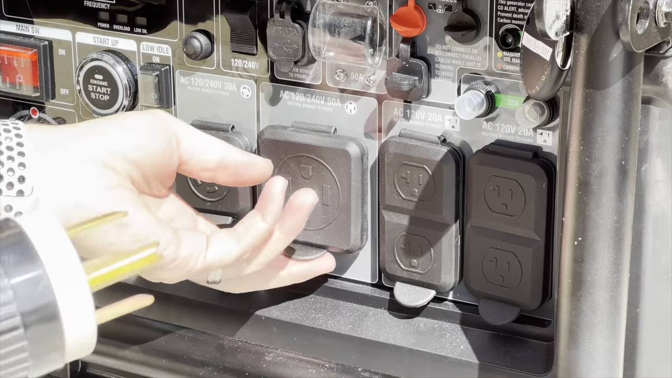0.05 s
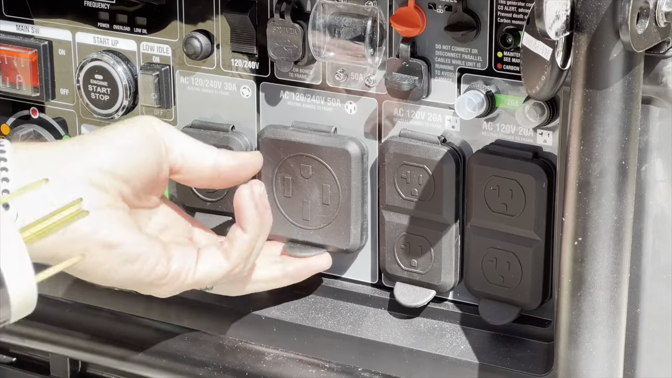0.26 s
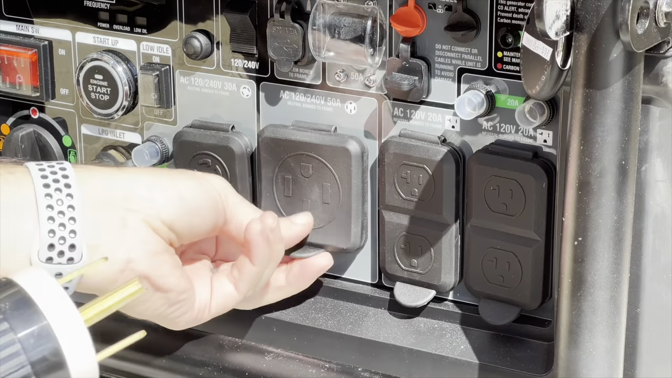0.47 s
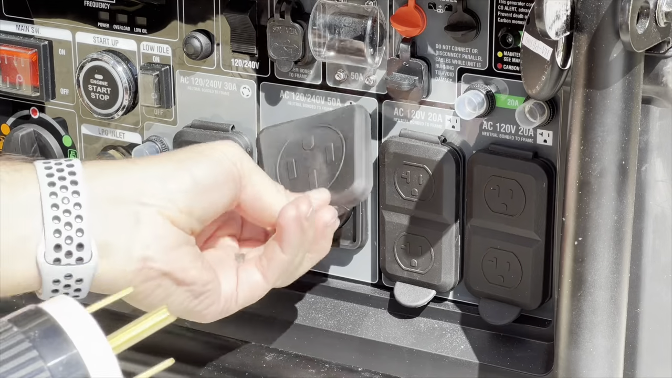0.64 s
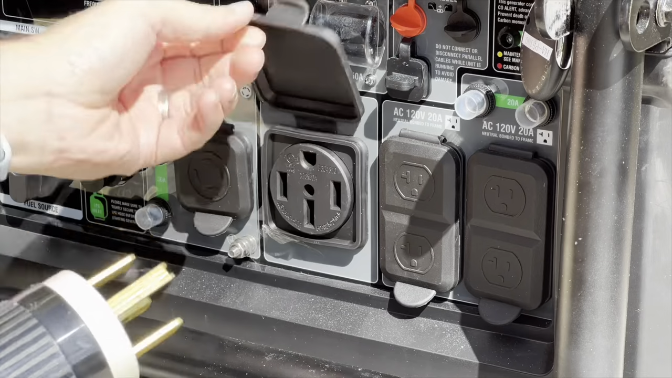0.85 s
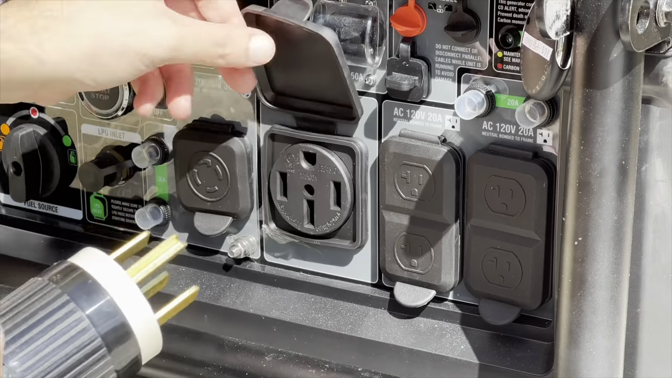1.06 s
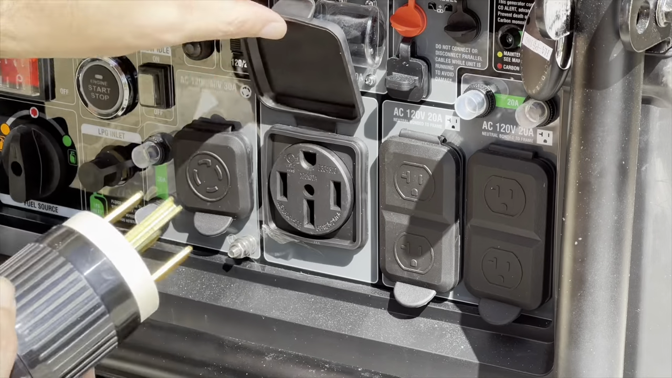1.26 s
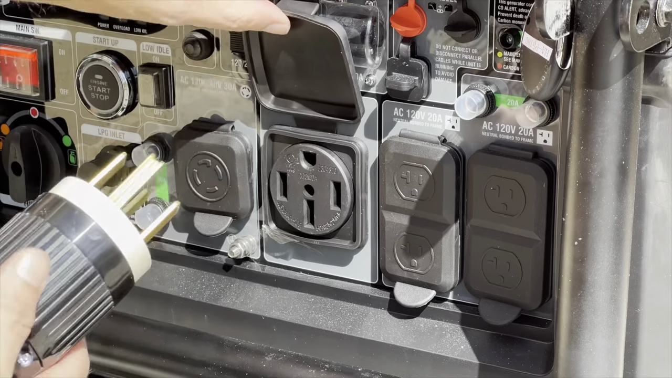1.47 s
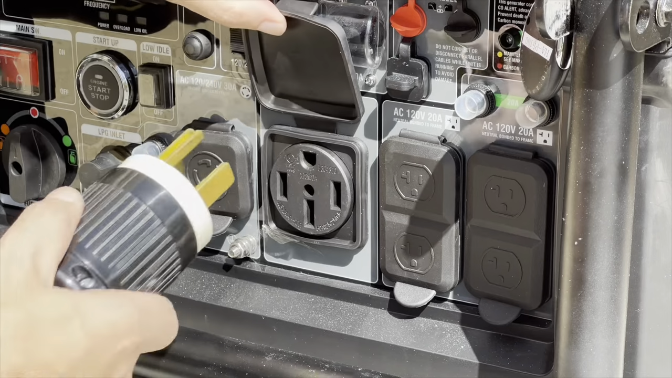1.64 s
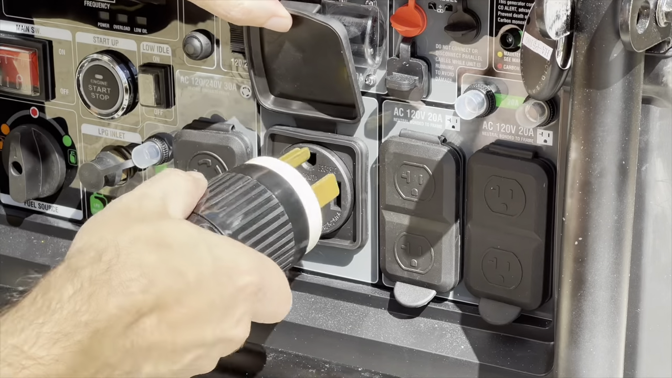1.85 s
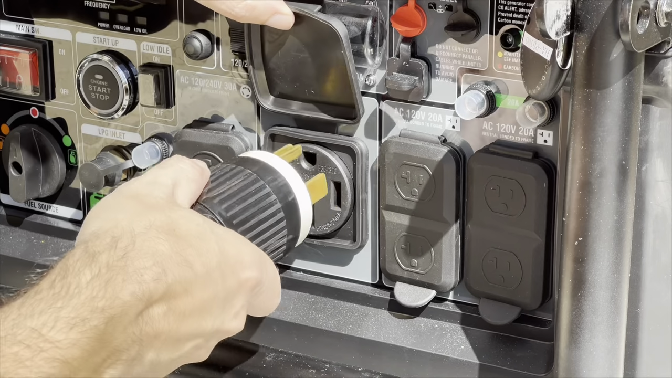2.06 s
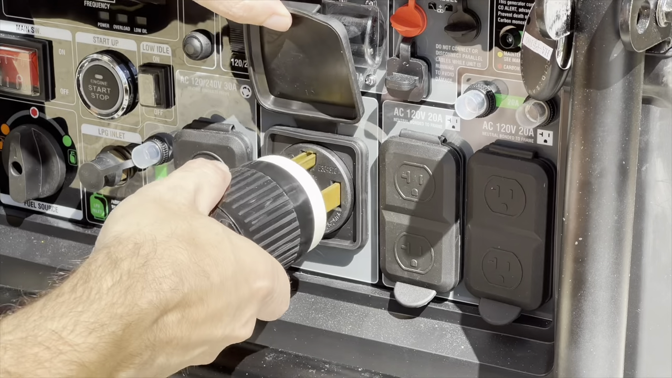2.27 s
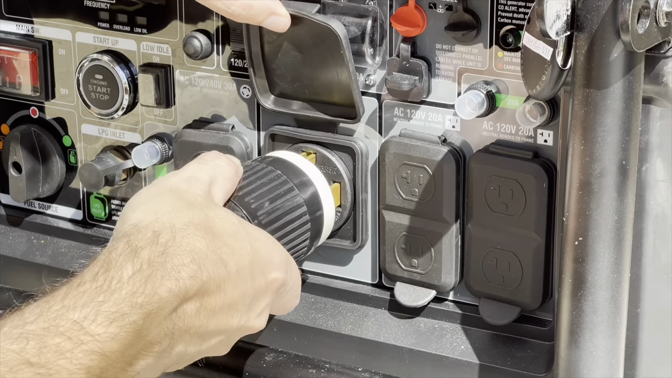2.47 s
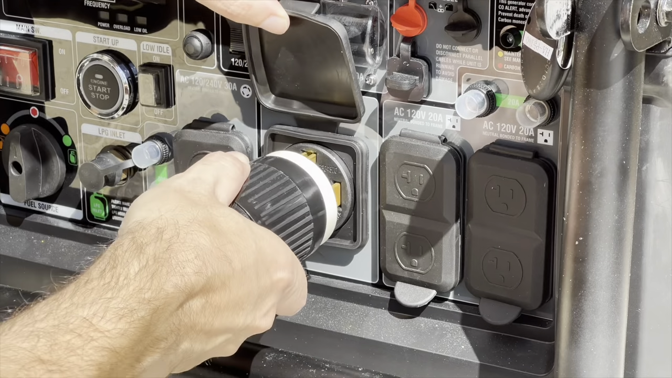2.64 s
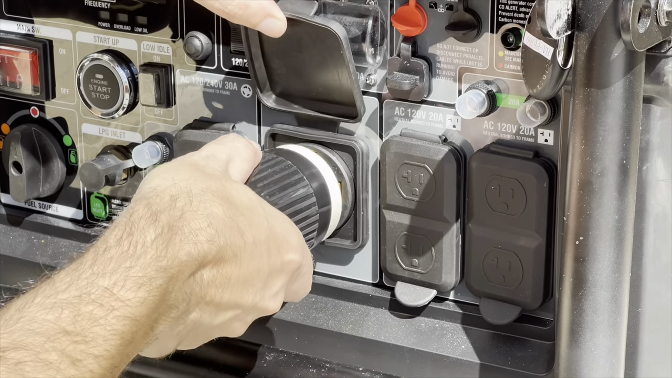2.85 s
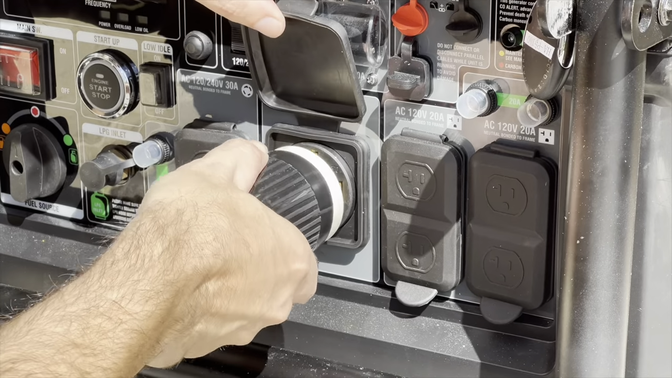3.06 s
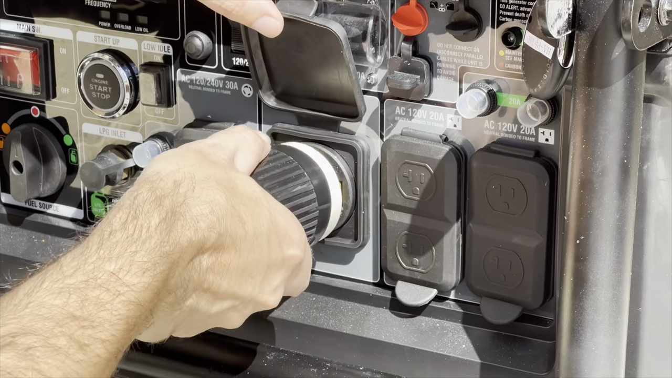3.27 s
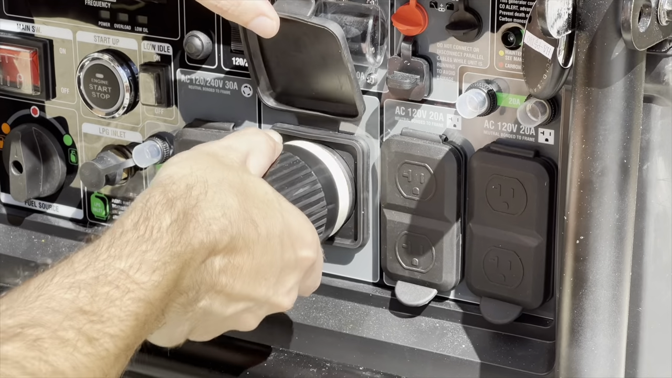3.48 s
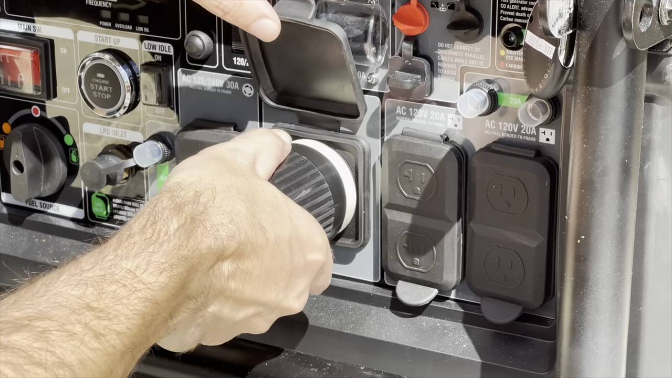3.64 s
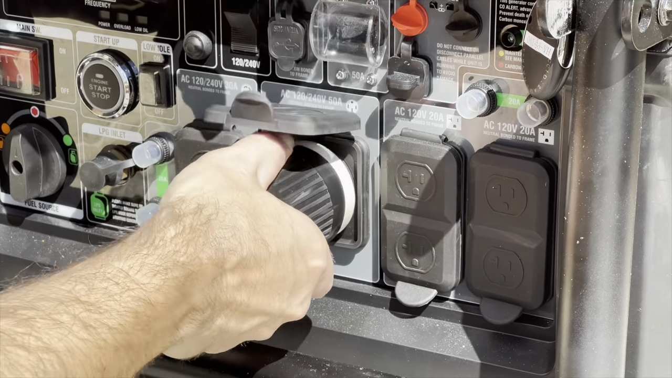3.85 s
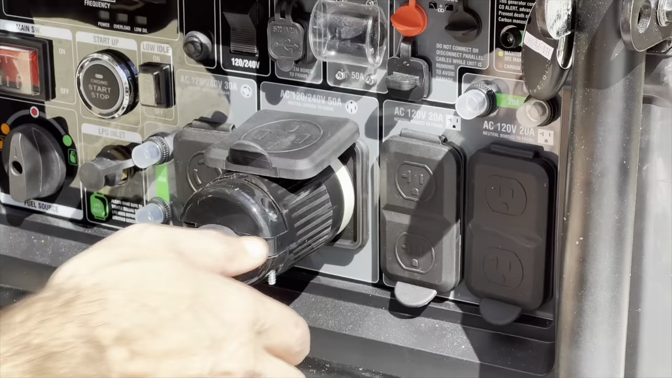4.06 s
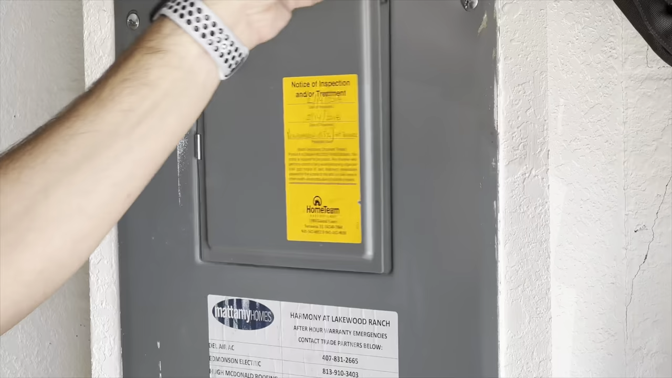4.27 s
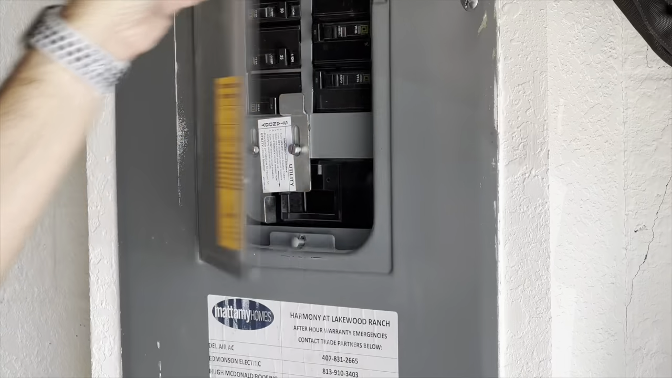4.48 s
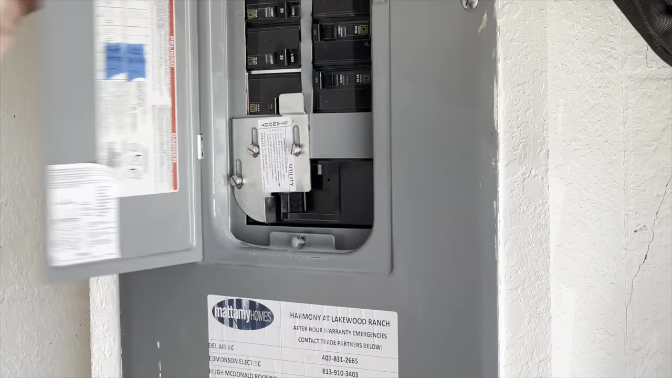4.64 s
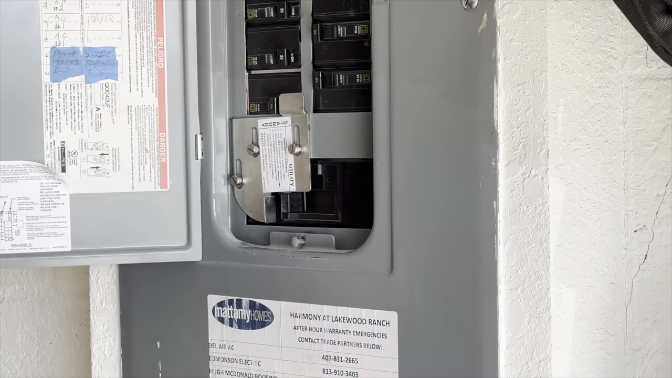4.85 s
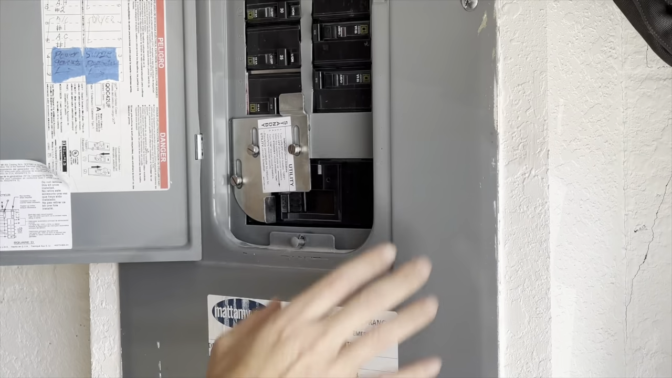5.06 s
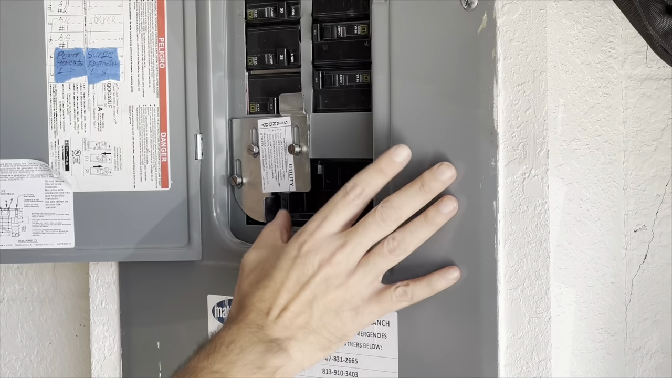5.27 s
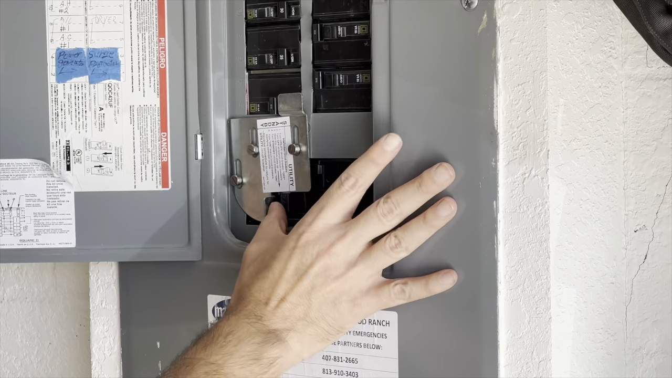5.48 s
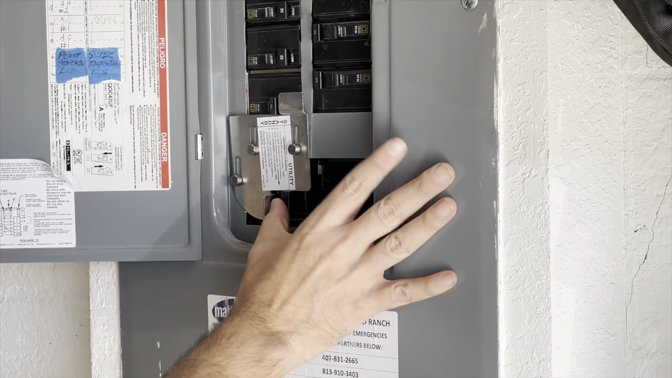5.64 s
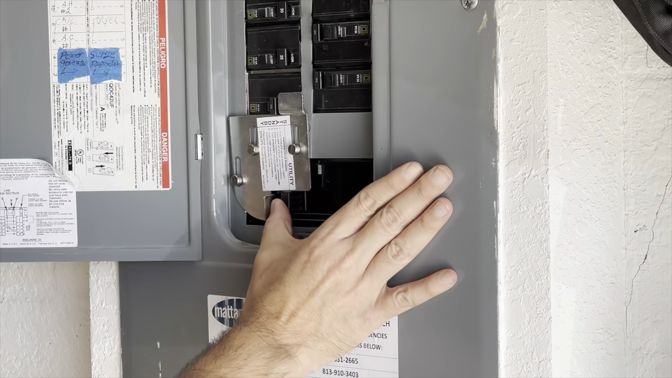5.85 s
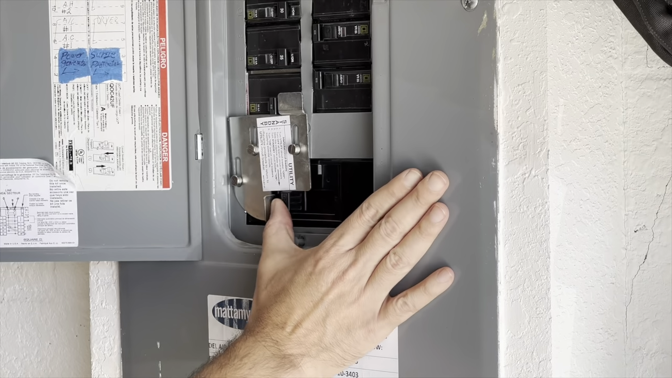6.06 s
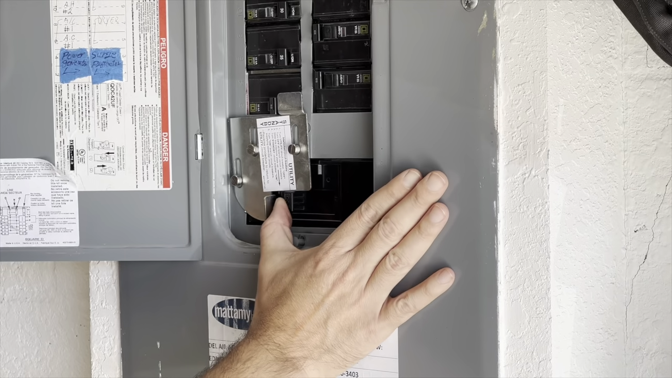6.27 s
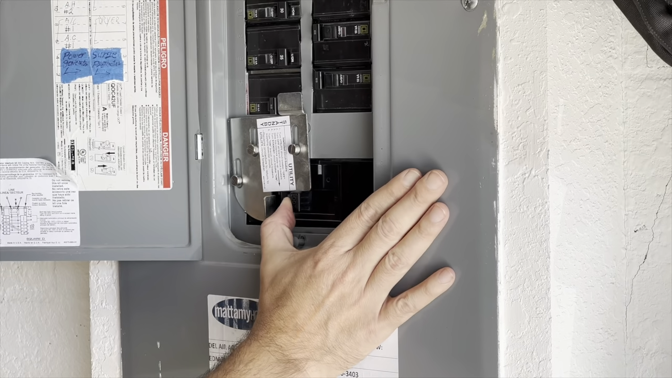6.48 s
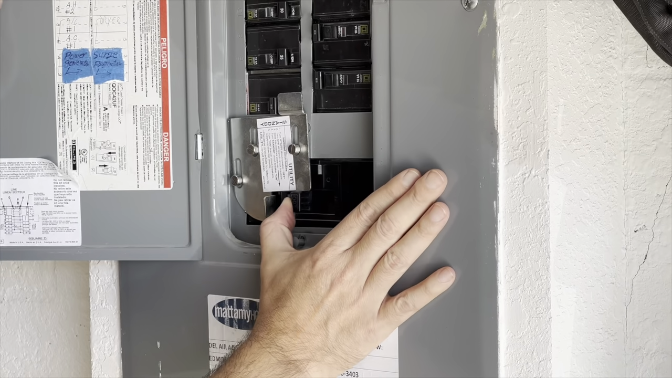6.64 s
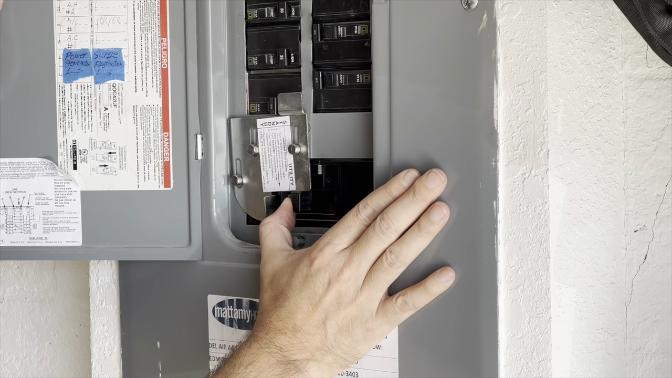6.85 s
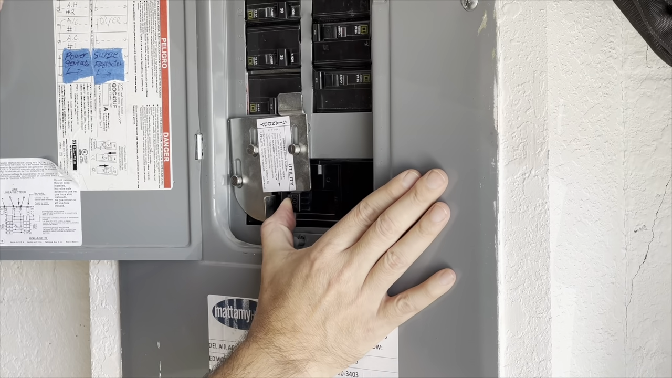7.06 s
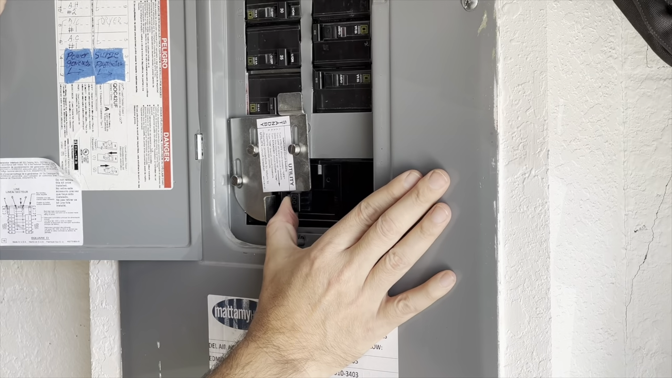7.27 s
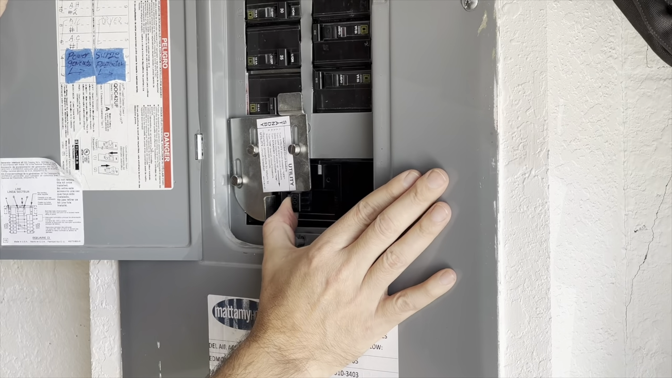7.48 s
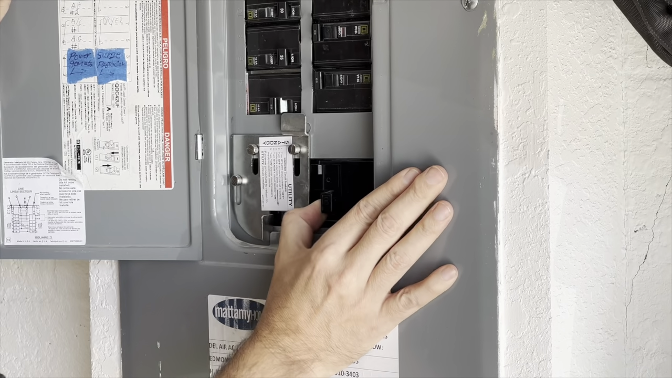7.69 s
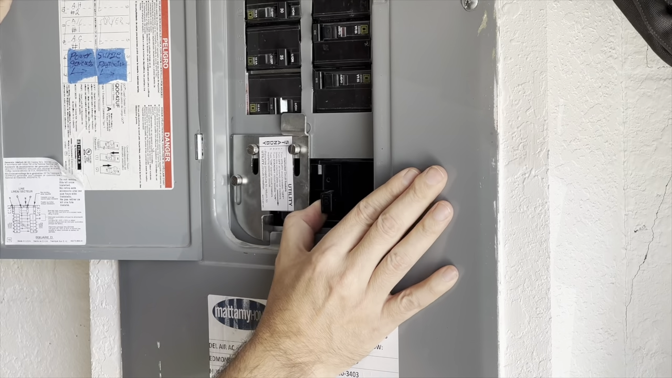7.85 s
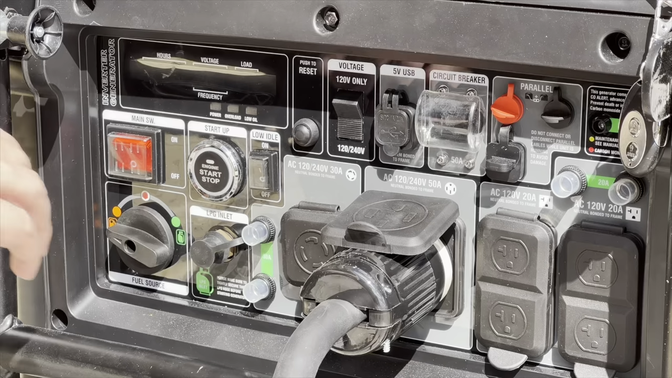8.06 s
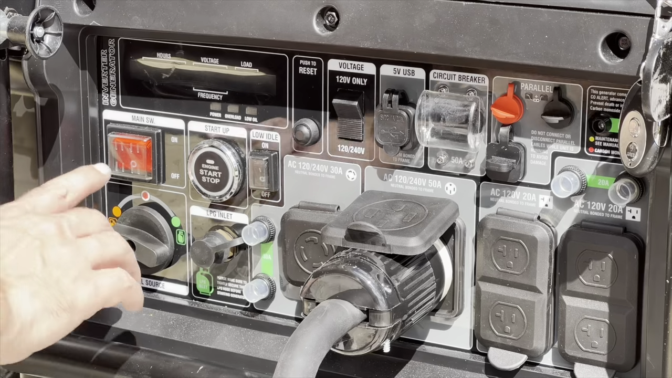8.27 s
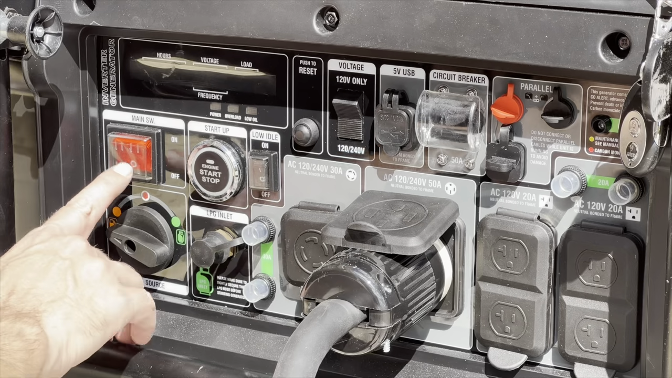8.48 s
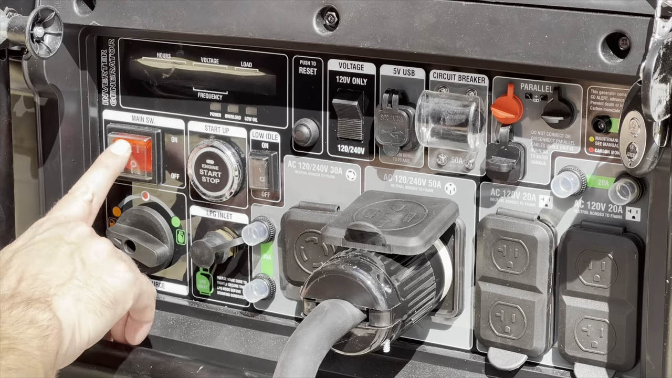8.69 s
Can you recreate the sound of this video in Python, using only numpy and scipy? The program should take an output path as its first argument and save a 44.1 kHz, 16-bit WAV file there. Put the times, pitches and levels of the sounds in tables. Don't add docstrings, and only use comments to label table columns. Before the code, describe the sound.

In a walled outdoor yard, a rubbery flap clicks sharply and a heavy plug scrapes, knocks and thumps into a socket, with fluttering echoes, wind rumble and a few bird chirps. The flap chatters down. A cut brings a steel box door clanking, small pushes, then a hard double snap that rings the sheet metal. Another cut leaves near silence with tiny finger ticks. Close handheld microphone.

```python
import sys
import numpy as np
from scipy import signal
from scipy.fft import rfft, irfft, next_fast_len
from scipy.io import wavfile
from scipy.ndimage import uniform_filter1d

SR = 44100
rng = np.random.default_rng(int(sys.argv[2]) if len(sys.argv) > 2 else 0)


def natural_amplitude(level_db):
    exponent = np.asarray(level_db, float) / 20
    return 10 ** exponent


def dump(signal):
    limited = np.clip(np.atleast_2d(signal).T, -1, 1)
    pcm = np.round(limited * 32767).astype(np.int16)
    wavfile.write(sys.argv[1], SR, pcm)


N = 384552

SCENE_CHANGES = (4.304, 7.975)

# [f/Hz, level/dB]
WIND_COLOUR = [(25, -41), (40, -13), (80, 3), (150, -0.5), (300, -10.5), (500, -22), (800, -42)]
TOWN_COLOUR = [(300, -5.5), (600, -1.5), (1400, -1), (2200, -5), (3200, -14.5), (6000, -34.5),
               (16000, -13.5)]
SCRAPE_COLOUR = [(800, -30), (2500, -2.5), (4500, -3), (7000, -2), (12000, -6.5), (16000, -2.5)]
# [f/Hz, level/dB]
HUSH_HUM_COLOUR = [(100, -27), (200, -3), (350, 0), (600, -5), (900, -34)]
# [t/s, level/dB]
EFFORT = [(0.0, -49.5), (0.48, -45.5), (0.8, -49), (1.22, -41.5), (1.9, -49), (2.19, -39.5), (2.42, -45),
          (2.74, -38.5), (3.04, -43), (3.45, -34), (3.83, -44), (4.1, -38.5), (4.33, -42), (4.62, -37.5),
          (4.84, -40), (5.2, -46.5), (5.58, -44), (7.5, -46.5)]
TOWN_LEVELS = (-50, -58.5, -82)
IDLE_HAND_LEVELS = (-76, -76.5, -94)
# [start t/s, length/s, level/dB]
RUBS = [(0.0, 0.45, -46.5), (0.74, 0.15, -51.5), (1.03, 0.15, -45.5), (1.733, 0.046, -54.5),
        (2.387, 0.26, -49), (2.696, 0.18, -45), (3.113, 0.16, -46.5), (3.46, 0.032, -49),
        (3.918, 0.077, -50.5), (4.146, 0.22, -51.5), (4.714, 0.091, -44.5), (4.95, 0.62, -69),
        (8.047, 0.49, -78)]

# [t/s, peak level/dB, main resonance f/Hz, 1 kHz share/dB, 7 kHz
# share/dB]
FLAP_AND_PLUG_CLICKS = [(0.0368, -41.5, 4770, -11, -5), (0.0745, -28.5, 2794, -6.5, -18),
                        (0.1445, -31, 2800, -15, -18.5), (0.1615, -28.5, 2500, -15, -12.5),
                        (0.2215, -30.5, 2900, -15.5, -11.5), (0.0792, -11, 6360, -5, -12),
                        (0.1505, -18, 3275, -15.5, -8), (0.1897, -27, 2356, -13, -5.5), (0.4873, -25, 3110, -17, -4),
                        (0.5003, -10.5, 3860, -14, -9.5), (0.538, -8, 2040, -17, -10), (0.5385, -17, 5500, -15, -10),
                        (0.5455, -19.5, 3970, -15.5, -6.5), (0.5475, -18.5, 4010, -10, -12),
                        (0.5505, -17.5, 3000, -9.5, -8.5), (0.5535, -20, 1890, -18.5, -21.5),
                        (0.722, -34, 1960, -19, -15), (0.7257, -27.5, 1960, -25, -14.5),
                        (0.7285, -29, 4550, -20, -18), (0.7305, -32.5, 3480, -19.5, -19.5),
                        (0.8265, -32.5, 1900, -15, -20), (0.8785, -29.5, 2000, -14.5, -22.5),
                        (0.961, -42, 4100, -20, -20), (0.8235, -29, 2800, -21.5, -14),
                        (0.8763, -28, 2660, -10.5, -22), (0.9852, -31, 2400, -10, -25),
                        (1.0944, -30, 6250, -19, -17), (1.6518, -33, 6500, -23, 4), (1.745, -35, 6500, -19.5, -2.5),
                        (1.7634, -35, 5500, -20, 0),
                        (2.144, -32, 1250, -11.5, -36.5), (2.198, -33, 1540, -11, -19), (2.41, -32, 3200, -26, -11),
                (2.4137, -25.5, 3000, -25, -16), (2.416, -27.5, 2900, -24.5, -20),
                (2.6615, -24, 3800, -6, -2), (2.669, -24, 1300, 4, -15), (2.67, -18, 4040, 4.5, -2.5),
                (2.707, -29.5, 3500, -25, -24.5), (2.703, -24.5, 6760, -46, -22),
                (2.838, -33.5, 7500, -22, -26), (3.0455, -26, 3440, -30, -9.5),
                (3.0593, -20.5, 6740, -25, -7.5), (3.106, -29, 6600, -25, -8.5),
                (3.1804, -26.5, 3270, -31, -4), (3.331, -34.5, 4530, -15.5, -13.5),
                (3.4945, -12.5, 1270, -4.5, -23), (3.5485, -31, 5860, -19.5, -20),
                (3.55, -34, 3400, -20, -25), (3.8, -42.5, 1340, -8, -20), (4.181, -35, 2680, -21, -13.5),
                (4.201, -26, 6690, -7, -12.5)]
FLAP_CHATTER = [(4.2797, -29.5, 2300, -13, -30), (4.2822, -29.5, 2300, -15, -25),
                (4.284, -17, 2297, -11, -6.5), (4.2865, -19, 6400, -23, -1),
                (4.2895, -15.5, 2306, -13.5, -3.5), (4.2915, -28, 4000, -24, -13),
                (4.2945, -17.5, 7000, -15, -10), (4.2962, -20.5, 7200, -19.5, -10),
                (4.298, -13, 7700, -20, -6), (4.3005, -25, 2298, -14, -10)]
# [t/s, peak level/dB, main resonance f/Hz, 7 kHz share/dB, fade by 60 dB/s]
SLIPS = [(1.6523, -36, 1490, 9.5, 0.93), (2.4088, -30, 2970, -3, 0.16), (2.5951, -32.5, 3520, -1.5, 0.78),
         (2.6608, -24.5, 3960, -7.5, 0.12), (3.0325, -28.5, 4470, 0, 0.2), (3.043, -25, 4050, -1, 0.84),
         (3.42, -44, 6280, 7, 0.28), (3.8703, -38.5, 1026, -10.5, 0.34), (4.1613, -32, 2800, -5, 0.51),
         (4.283, -25.5, 2240, -6, 0.2)]
# [t/s, peak level/dB, f/Hz, overtone share/dB]
FRAME_THUMPS = [(0.336, -32, 79.2, -13), (0.372, -33, 99.2, -21), (0.545, -25, 295, -23),
                (0.83, -32.5, 154, -6.5), (1.161, -30.5, 131.4, -24), (1.33, -31.5, 148.3, -30),
                (1.46, -32, 104, -23), (2.149, -23.5, 137.5, -14.5), (2.19, -28, 134.7, -12),
                (2.393, -31.5, 103.6, -12.5), (2.675, -17.5, 124.8, -8), (2.84, -33.5, 95.4, 3.5),
                (3.34, -28.5, 90, -2.5), (3.36, -32.5, 252.6, -8.5), (3.379, -29.5, 180, 1),
                (3.497, -14, 280, -22), (3.507, -11, 133.6, -14), (3.527, -18, 260, -18),
                (3.56, -22, 200, -14), (3.804, -29.5, 110.9, -21.5), (3.931, -30.5, 101.5, -24),
                (3.987, -28.5, 61.7, -11), (4.17, -30, 420, -10), (4.185, -27, 212.4, -4),
                (4.248, -21.5, 79.5, -22)]
# [f as a multiple of the main note, level/dB]
LOOSE_PARTS = [(.5, -22), (.8, 7.5), (1.5, 4.5), (2.8, -3.5), (4.5, -18), (8.001, -40)]
# [t/s, f/Hz, spread/Hz, level/dB, echo fall/(dB per s)]
BIRDS = [
    (1.079, 6550, 900, -44.5, 72),
    (1.355, 6500, 833.3, -56.5, 96),
    (1.9, 7300, 972, -72, 150),
    (2.69, 6390, 898, -35.5, 115),
    (8.325, 6070, 216, -75, 400),
]
# [start t/s, end t/s, f/Hz, level/dB]
SQUEAK = (4.008, 4.11, 3343, -50)

# [t/s, peak level/dB, main resonance f/Hz, 1 kHz share/dB, 7 kHz share/dB]
DOOR_CLANKS = [(4.5004, -32.5, 5750, 1.5, -6), (4.5236, -33, 1490, 9, -14), (4.566, -31.5, 3130, -2.5, -19),
               (4.59, -27, 5500, -13.5, -12), (4.6225, -28, 3540, -13.5, -40),
               (4.7035, -20.5, 4670, -4, -12), (4.7105, -21, 3500, -3.5, -11),
               (4.7205, -25.5, 2680, -4, -15), (4.7588, -28.5, 2250, 3, -13),
               (4.7988, -41, 1920, -7, -20.5), (5.3946, -46, 1460, 0, -24), (5.4606, -29, 1850, -8.5, -26),
               (5.4937, -24.5, 3040, -5, -15), (5.5195, -24, 1470, -5.5, -15.5),
               (5.5444, -34, 1080, 0, -16)]
PUSHES = [(5.911, -51.5, 3250, -15.5, -16), (6.1795, -24, 1910, -23, -37),
          (6.2268, -30, 1390, -10.5, -35.5), (6.4046, -38, 2470, 0.5, -13), (6.4235, -38, 1500, -3, -12.5),
          (6.4295, -35, 2530, -4, -21), (6.447, -37, 1500, -6.5, -10.5), (6.4652, -31.5, 2016, 4, -19.5)]
SNAP = [
    (7.6065, -7, 3900, -8.5, -7.5),
    (7.6115, -13, 2840, -5, -11.5),
    (7.6841, -11, 3330, -8, -7),
    (7.6913, -15.5, 5350, -12, -8.5),
]
# [f/Hz, level/dB, fade by 60 dB/s]
SLIDE_MODES = [(2040, -6, 0.039), (2250, -19, 3.4), (2710, -6.5, 2.9), (3380, -4.5, 0.096),
               (4140, 1.5, 0.059), (4584, -13.5, 1.1), (5030, -20, 0.13), (5196, -4.5, 0.19),
               (6380, -0.5, 0.4), (7790, -66, 5.0)]
LEVER_MODES = [(1960, 0, 0.057), (2595, -11.5, 0.035), (3303, -0.5, 0.1), (5240, -2, 0.12)]
DOOR_MODES = [(1410, -20.5, 0.99), (2169, -23.5, 1.1), (2799, -17, 0.66), (3257, 0.5, 0.2),
              (4370, -16, 0.441), (5270, -14, 0.59), (5240, -15, 0.59), (5696, -14.5, 0.65),
              (6540, -9.5, 0.47), (6770, -13, 0.83), (7450, -20, 0.56), (7800, -21, 0.35),
              (8200, -19, 0.43), (8200, -18, 0.39)]
# [f/Hz, share of the blow's own fade time]
SHEET_FADES = [(500, 1.4), (1000, 0.91), (2000, 1.19), (4000, 1.1), (8000, 1.04), (16000, 0.48)]
# [t/s, peak level/dB, f/Hz, fade by 60 dB/s]
BOX_PINGS = [(4.523, -38, 1450, 0.16), (4.5855, -35, 3050, .02), (4.5908, -26, 5200, 0.023),
             (4.5912, -39, 3050, 0.018), (4.622, -39, 2660, .04), (4.628, -39, 3520, 0.054),
             (4.708, -30, 4820, 0.056), (4.743, -33, 1520, .1), (4.774, -38, 4320, 0.072),
             (5.495, -33.5, 1455, 0.19), (6.1793, -33.5, 1970, .03), (6.186, -31, 3290, 0.037),
             (6.2268, -26.5, 1205, 0.012), (6.2268, -33, 2920, .012), (6.43, -35.5, 2530, 0.066),
             (6.434, -37, 1450, .08), (6.459, -38, 3630, .04), (6.461, -42, 6300, .04),
             (7.6049, -18.5, 2230, .01), (7.609, -14.5, 4820, 0.01), (7.613, -16, 2810, 0.022),
             (7.682, -19.5, 3257, 0.093), (7.69, -26, 5300, .05), (7.7, -27, 2830, .05)]
# [t/s, peak level/dB, f/Hz, overtone share/dB]
BOX_BOOMS = [(4.533, -30.5, 140, 1.5), (4.578, -28.5, 282, -14), (4.621, -30.5, 259, -12.5),
             (4.66, -26.5, 149, -9.5), (4.714, -28, 244, -9), (4.749, -26.5, 155.6, 1),
             (4.791, -32.5, 256, -24), (4.849, -37.5, 236, -22), (5.413, -39, 220, -17.5),
             (5.477, -30.5, 224, -29), (5.519, -33, 238, -16), (6.236, -37.5, 212.6, -21),
             (6.25, -37.5, 230.4, -19), (6.455, -38, 225, -5.5), (7.622, -27, 226.6, -12.5),
             (7.636, -31, 215, -12), (7.688, -33, 237.5, -14.5), (7.738, -40, 245, -6),
             (7.82, -48, 79.4, -19), (7.888, -46.5, 80, -19)]
# [f/Hz, level/dB]
SKID_TONES = [(8050, -30), (5750, -40)]
SKID_SPAN = (7.594, 7.608)

# [t/s, peak level/dB, main resonance f/Hz, 1 kHz share/dB, 7 kHz share/dB]
FINGER_TICKS = [
    (8.328, -59, 6010, -17, -35),
    (8.3631, -50.5, 3590, -23, -32),
    (8.3917, -50, 3970, -44, -19),
    (8.4044, -58, 3750, -30, -17),
]
# [t/s, peak level/dB, f/Hz, fade by 60 dB/s]
SWITCH_TINGS = [(8.3275, -61, 2750, 0.029), (8.362, -52, 3520, .05), (8.364, -65, 2720, .03),
                (8.39, -58, 3740, .12), (8.391, -61, 4520, .05), (8.391, -58, 5850, .05),
                (8.391, -60, 6560, .04), (8.403, -65, 3670, .06)]
# [t/s, peak level/dB, f/Hz, overtone share/dB]
SOFT_TAPS = [
    (8.019, -45.5, 416, -38),
    (8.046, -62, 376, -17),
]

# [f/Hz,
# level/dB]
PORT_MID = [(8000, 0.5), (9000, -6.5), (9700, -24), (10500, -19), (11300, -2.5), (12500, 1), (14500, -8),
            (15400, -16.5), (16200, -38)]
SIDE_COLOUR = [(30, -14.5), (200, -22), (500, -11), (1100, -6.5), (1800, -25.5), (2200, -36), (7000, -32.5),
               (7700, -15.5), (12200, -6.5), (12800, -33.5), (14300, -27.5), (15000, -21.5), (16300, -46)]

FLUTTER_S = 0.0168
FIRST_ECHO_DB, TRIP_DB, TRIP_DAMP = -5, -4.4, 0.15
HISS_DB = -70.5
HUSH_RUMBLE_DB, HUSH_FADE_IN_S = -86, 0.034
RUB_RISE_DB_S, RUB_FALL_DB_S = 117, 101.5
SKID_RISE_DB_S = 900
SLIP_LOW_DB = -7
PLASTIC_T60_S, CHATTER_T60_S, TICK_T60_S = 0.028, 0.033, 0.048
DOOR_T60_S, HELD_T60_S, SNAP_T60_S = 0.36, 0.27, 0.7
FRAME_CYCLES, BOX_CYCLES, TAP_CYCLES, RING_CYCLES = 17.5, 46, 8.2, 12.0
DOOR_GIVE_S, PUSH_GIVE_S, SNAP_GIVE_S = 0.006, 0.002, 0.007
NOTE_S, SPLICE_S = 0.025, 0.029


def colour(x, points, causal=False):
    size = next_fast_len(len(x))
    hz, db = np.transpose(points)
    bins_hz = np.arange(1, size // 2 + 2) * SR / size
    gain = natural_amplitude(np.interp(np.log(bins_hz), np.log(hz), db))
    if causal:
        k = np.arange(size)
        fold = np.where(k == 0, 1, 2 * (k < size / 2))
        gain = np.exp(rfft(irfft(np.log(gain), size) * fold))
    return irfft(rfft(x, size) * gain, size)[:len(x)]


def unit(x):
    return x / np.sqrt(np.mean(x ** 2))


def decay(t, t60):
    return np.exp(-np.log(1000) * t / t60)


def fade(t60, length):
    return decay(np.arange(int(length * SR)) / SR, t60)


def ring(hz, gain, t60, length):
    t = np.arange(int(length * SR))[:, None] / SR
    return (np.sin(2 * np.pi * hz * t) * decay(t, t60)) @ gain


def add(track, s, x, db):
    i = int(s * SR)
    x = x[:N - i]
    track[i:i + len(x)] += x * natural_amplitude(db) / np.abs(x).max()


def walk(rate):
    k = int(SR / rate)
    steps = np.repeat(rng.standard_normal(N // k + 1), k)
    return unit(uniform_filter1d(uniform_filter1d(steps, k), k)[:N])


def lasting(table, t60):
    return [row + (t60,) for row in table]


def strike(hz, low_db, high_db, bump_db):
    f = np.geomspace(300, 16000, 40)
    middle_db = np.clip(high_db + 15.0, -15, -4)
    shelf_db = [low_db - 1.0, low_db, middle_db, high_db + 5.0, high_db + 6.0]
    db = np.interp(np.log(f), np.log([400, 1000, 3000, 7000, 13000]), shelf_db)
    return np.c_[f, db + bump_db / (1 + ((f - hz) / (0.2 * hz)) ** 2)]


def levels(t, shot):
    rumble = np.where(shot < 2, np.interp(t, *np.transpose(EFFORT)), HUSH_RUMBLE_DB)
    rub = np.take(IDLE_HAND_LEVELS, shot).astype(float)
    for s, length, db in RUBS:
        rise = RUB_RISE_DB_S * np.maximum(s - t, 0)
        fall = RUB_FALL_DB_S * np.maximum(t - s - length, 0)
        rub = np.maximum(rub, db - rise - fall)
    fade_in = 10 * np.clip((t - SCENE_CHANGES[1]) / HUSH_FADE_IN_S - 1, -1, 0) * (shot == 2)
    return rumble, np.take(TOWN_LEVELS, shot) + fade_in, rub + fade_in


def background():
    t = np.arange(N) / SR
    shot = np.searchsorted(SCENE_CHANGES, t)
    wind_db, town_db, scrape_db = levels(t, shot)
    gust = natural_amplitude(wind_db + 2.5 * walk(18))
    swell = natural_amplitude(town_db + 1.2 * walk(12))
    rub = natural_amplitude(scrape_db + 1.5 + 1.8 * walk(40))
    grains = natural_amplitude(1.6 * np.repeat(np.minimum(rng.exponential(size=N // 40 + 1), 4), 40)[:N])
    hiss_gain = natural_amplitude(HISS_DB - 22 * (shot == 2))
    out = []
    for noise in rng.standard_normal((2, 5, N)):
        outdoors = unit(colour(noise[0], WIND_COLOUR))
        hum = unit(colour(noise[1], HUSH_HUM_COLOUR))
        wind = np.where(shot < 2, outdoors, hum) * gust
        town = unit(colour(noise[2], TOWN_COLOUR)) * swell
        scrape = unit(colour(noise[3] * grains, SCRAPE_COLOUR)) * rub
        hiss = unit(colour(noise[4], [(10500, -27), (12500, 3), (14500, -12.0)])) * hiss_gain
        out.append(wind + town + scrape + hiss)
    return out


def clicks(table, crack, bump_db, grit_db, ring_db, size):
    out = np.zeros(N)
    t = np.arange(-400, size) / SR
    after = np.maximum(t + 0.0004, 0)
    build_up = (1 + crack) * 0.3 * np.exp(np.minimum(t, 0) / 0.0011)
    for s, db, hz, low_db, high_db, t60 in table:
        tail = 0.4 * crack * np.exp(-t / 0.00034) + decay(t, t60)
        shape = np.where(t < 0, build_up, tail)
        grit = natural_amplitude(grit_db * np.repeat(rng.standard_normal(len(t) // 100), 100))
        force = rng.standard_normal(len(t)) * shape * grit + 3.0 * crack * (t == 0)
        rattle = colour(force, strike(hz, low_db, high_db, bump_db), causal=True)
        note = np.sin(2 * np.pi * hz * after) * decay(after, RING_CYCLES / hz)
        note = note * (1 - np.exp(-after / 0.00045))
        sound = rattle / np.abs(rattle).max() + natural_amplitude(ring_db) * note
        add(out, s + t[0] + 0.0005, sound, db + 4)
    return out


def blows(table, cycles, shake_db):
    out = np.zeros(N)
    for s, db, hz, over_db in table:
        t60 = cycles / hz
        mode = np.sin(2 * np.pi * hz * np.arange(int(0.4 * SR)) / SR) * fade(t60, 0.4)
        parts = [(hz * k, d) for k, d in LOOSE_PARTS]
        shudder = unit(colour(rng.standard_normal(len(mode)), parts))
        body = mode + natural_amplitude(over_db + shake_db) * shudder * fade(1.35 * t60, 0.4)
        add(out, s, body * (1 - fade(0.019, 0.4)), db + 6.0)
    return out


def flutter(x):
    size = next_fast_len(N)
    gap = np.zeros(int(FLUTTER_S * SR) - 2)
    loop = np.r_[1, -TRIP_DAMP, gap, -natural_amplitude(TRIP_DB) * (1 - TRIP_DAMP)]
    bounced = irfft(rfft(x, size) * rfft([1, -TRIP_DAMP], size) / rfft(loop, size), size)[:N]
    echoes = natural_amplitude(FIRST_ECHO_DB) * (bounced - x)
    rough_wall = np.r_[1, natural_amplitude(-24) * rng.standard_normal(200) * fade(0.006, 1)[:200]]
    wash = natural_amplitude(-47) * rng.standard_normal(9000) * fade(0.3, 1)[:9000] * (1 - fade(0.05, 1)[:9000])
    return x + signal.fftconvolve(echoes, rough_wall)[:N] + signal.fftconvolve(x, wash)[:N]


def flap_and_plug():
    slips = [(s, db, hz, SLIP_LOW_DB, high_db, t60) for s, db, hz, high_db, t60 in SLIPS]
    knocks = clicks(lasting(FLAP_AND_PLUG_CLICKS, PLASTIC_T60_S), 2.2, 12, 0.8, -1.0, size=2000)
    thumps = blows(FRAME_THUMPS, FRAME_CYCLES, 10)
    echoing = flutter(knocks + natural_amplitude(-12.5) * thumps)
    slipping = clicks(slips, 0.22, 8.8, 1.7, -14, size=6000)
    chatter = clicks(lasting(FLAP_CHATTER, CHATTER_T60_S), 3.0, 15, 0.5, -2.5, size=1600)
    return echoing + natural_amplitude(-9) * thumps + slipping + chatter


def birds():
    out = np.zeros(N)
    t = np.arange(16000) / SR
    for s, hz, spread_hz, db, fall in BIRDS:
        band = [(hz - 0.6 * spread_hz - 50, -30), (hz - 0.4 * spread_hz, 0),
                (hz + 0.45 * spread_hz, -2), (hz + 1.8 * spread_hz + 50, -26)]
        note_end_db = np.clip((t - NOTE_S) * 300, 0, 9)
        trill_db = 3.5 * np.repeat(rng.standard_normal(80), 200)
        fall_db = note_end_db + trill_db + np.maximum(t - NOTE_S, 0) * fall
        chirp = colour(rng.standard_normal(len(t)), band) * np.minimum(t / 0.006, 1)
        add(out, s, chirp * natural_amplitude(-fall_db), db + 17.0)
    return out


def squeak():
    start, end, hz, db = SQUEAK
    t = np.arange(N) / SR
    gate = np.interp(t, [start, start + 0.006, end - 0.02, end + 0.02], [0, 1, 0.5, 0])
    loudness = natural_amplitude(db + 1.6 * walk(60)) * gate
    turns = np.cumsum(hz * (1 + 0.0027 * walk(45))) / SR
    return loudness * np.sin(2 * np.pi * turns)


def steel_door(table, modes, crack, lines_db, longest, give, size):
    out = np.zeros(N)
    t = np.arange(-300, size) / SR
    mode_hz, mode_db, mode_t60 = np.transpose(modes)
    bands = []
    for hz, share in SHEET_FADES:
        band_edges = [(hz / 2, -30), (hz / 1.6, 0), (hz * 1.3, 0), (hz * 2, -30)]
        bands.append(colour(rng.standard_normal(4 * size), band_edges))
    for s, db, peak_hz, low_db, high_db, t60 in table:
        crowd = np.zeros(len(t))
        skips = rng.integers(2 * size, size=len(bands))
        for band, (hz, share), skip in zip(bands, SHEET_FADES, skips):
            crowd += band[skip:skip + len(t)] * (decay(t, t60 * share) + crack * np.exp(-t / 0.0059))
        hz = mode_hz * (1 + 0.001 * rng.standard_normal(len(modes)))
        gain = natural_amplitude(mode_db + 3.9 * rng.standard_normal(len(modes)))
        chime = ring(hz, gain, np.clip(mode_t60, 0.03, longest), len(t) / SR + 0.001)
        sound = unit(crowd) + natural_amplitude(lines_db) * unit(chime[:len(t)])
        sound = sound * np.clip(t / give + 0.5, 0, 1) ** 2
        add(out, s + t[0], colour(sound, strike(peak_hz, low_db, high_db, 6.0)), db + 3)
    return out


def pings(table):
    out = np.zeros(N)
    for (s, db, hz, t60), apart in zip(table, rng.uniform(0.02, 0.07, len(table))):
        pair = ring(hz * np.array([1, 1 + apart]), np.array([1, 0.4]), t60, 0.15)
        add(out, s, pair * (1 - fade(0.0029, 0.15)), db)
    return out


def skid():
    out = np.zeros(N)
    t = np.arange(int((SKID_SPAN[1] - SKID_SPAN[0]) * SR)) / SR
    swell = natural_amplitude(SKID_RISE_DB_S * t) * np.minimum(t / 0.003, 1)
    for hz, db in SKID_TONES:
        add(out, SKID_SPAN[0], swell * np.sin(2 * np.pi * hz * t), db)
    return out


def breaker_box():
    clanks = steel_door(lasting(DOOR_CLANKS, DOOR_T60_S), SLIDE_MODES, 0.9, -8.5, 0.12, DOOR_GIVE_S, size=13000)
    pushes = steel_door(lasting(PUSHES, HELD_T60_S), LEVER_MODES, 0.8, -12.0, 0.2, PUSH_GIVE_S, size=10000)
    snap = steel_door(lasting(SNAP, SNAP_T60_S), DOOR_MODES, 4.5, -16, 0.97, SNAP_GIVE_S, size=17000)
    return clanks + pushes + pings(BOX_PINGS) + skid() + snap + blows(BOX_BOOMS, BOX_CYCLES, 5.0)


def fingertip():
    ticks = clicks(lasting(FINGER_TICKS, TICK_T60_S), 1.5, 8, 0.8, -16.0, size=2600)
    return ticks + pings(SWITCH_TINGS) + blows(SOFT_TAPS, TAP_CYCLES, 2.8)


def scene():
    t = np.arange(N) / SR
    near = flap_and_plug() * (t < SCENE_CHANGES[0]) + breaker_box() * (t < SCENE_CHANGES[1])
    near = near + fingertip() + birds() + squeak()
    far, around = background()
    turned = np.imag(signal.hilbert(near, next_fast_len(N)))[:N]
    scatter = rng.standard_normal(2600) * fade(0.079, 1)[:2600]
    scatter = scatter / np.linalg.norm(scatter)
    scattered = signal.fftconvolve(near, scatter)[:N] * (t < SCENE_CHANGES[1])
    side = colour(turned + natural_amplitude(-10.0) * scattered + natural_amplitude(7.5) * around, SIDE_COLOUR)
    side += natural_amplitude(-15) * colour(turned, [(1500, -10), (2200, -1.5), (5000, -1), (7500, -3)])
    splice = np.ones(N)
    for s in SCENE_CHANGES:
        splice *= np.where(t < s, 1, np.clip((t - s) / SPLICE_S, 0.15, 1))
    return np.array([near + far + side, near + far - side]) * splice


def low_pass(x):
    return signal.sosfilt(signal.butter(12, 16500, fs=SR, output="sos"), x)


def record(dry):
    mid = colour((dry[0] + dry[1]) / 2, PORT_MID)
    side = (dry[0] - dry[1]) / 2
    mix = np.array([mid + side, mid - side])
    return low_pass(mix)


dry = scene()
out = record(dry)
dump(out)
```